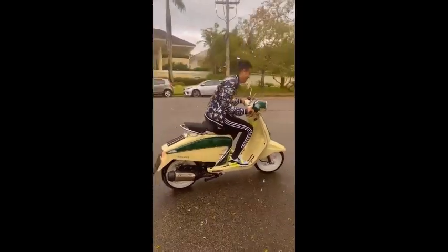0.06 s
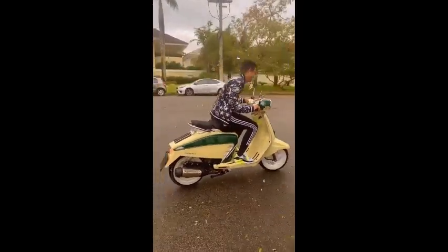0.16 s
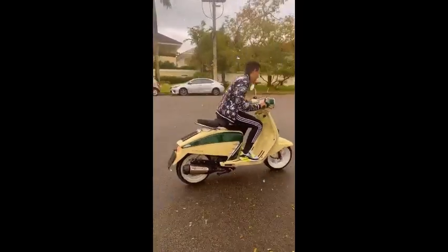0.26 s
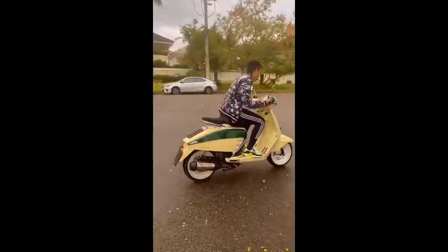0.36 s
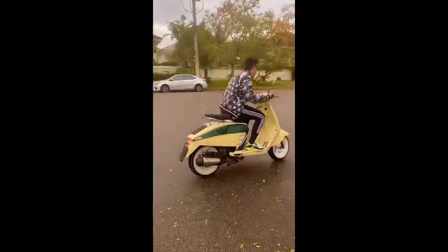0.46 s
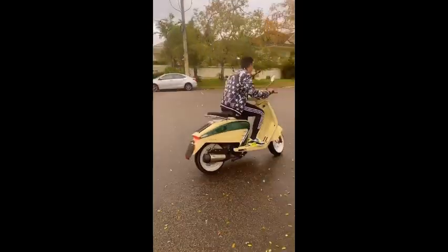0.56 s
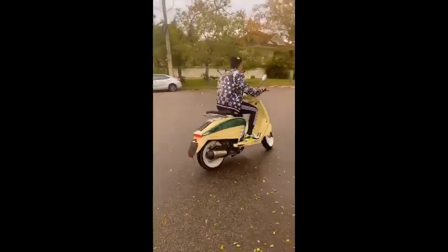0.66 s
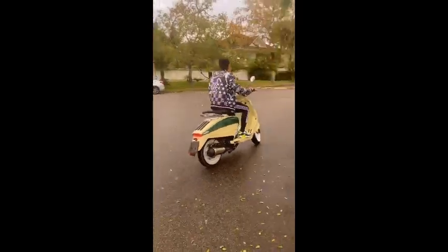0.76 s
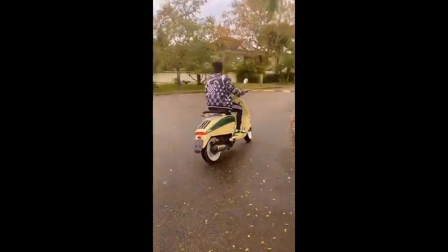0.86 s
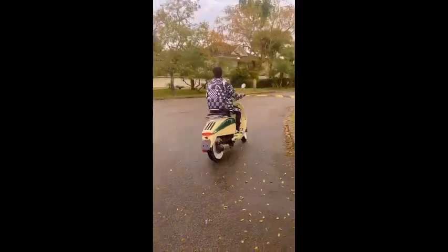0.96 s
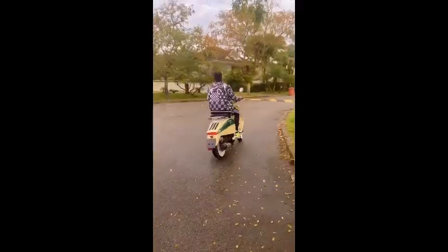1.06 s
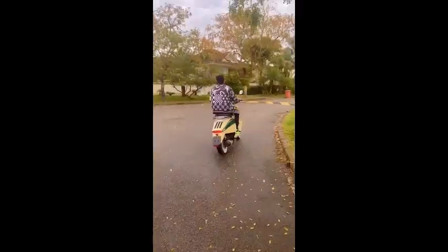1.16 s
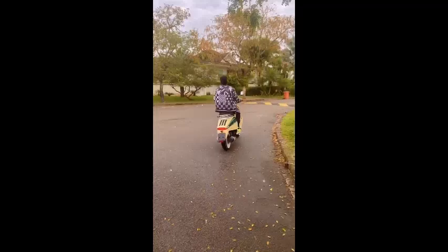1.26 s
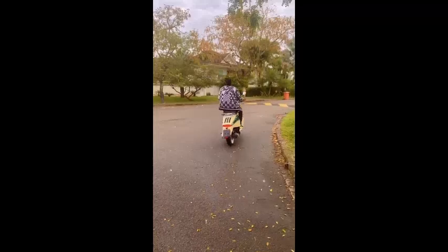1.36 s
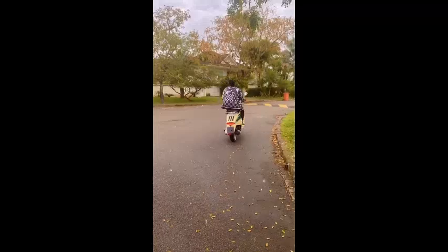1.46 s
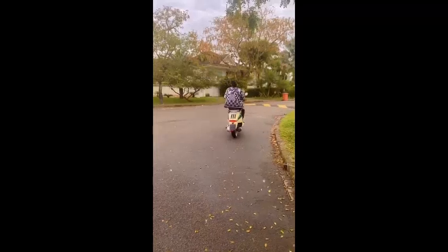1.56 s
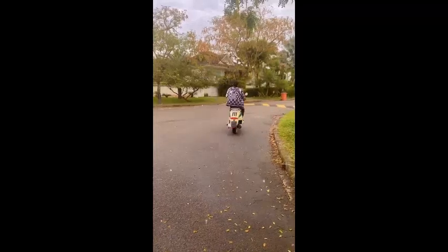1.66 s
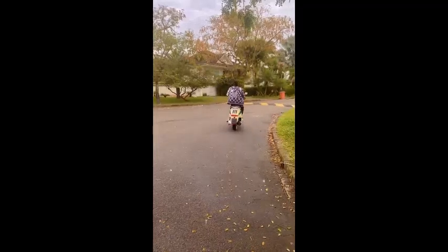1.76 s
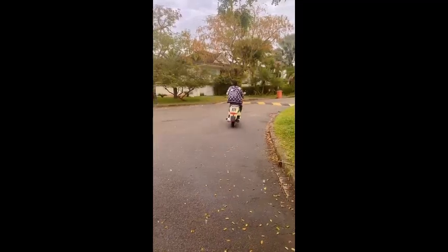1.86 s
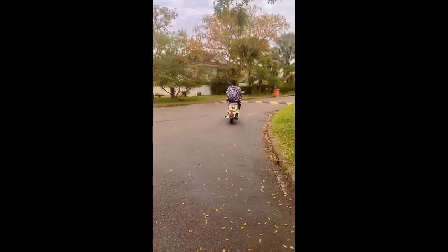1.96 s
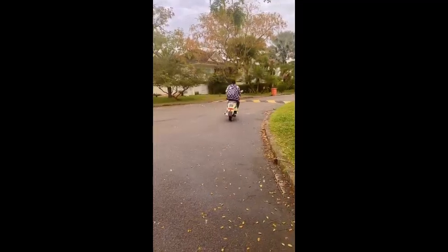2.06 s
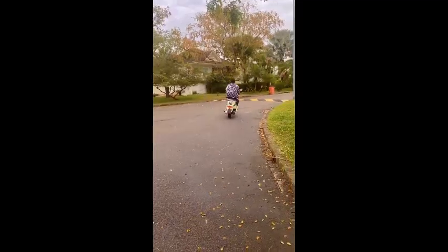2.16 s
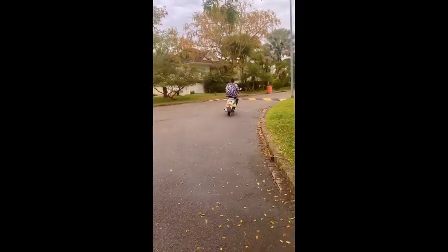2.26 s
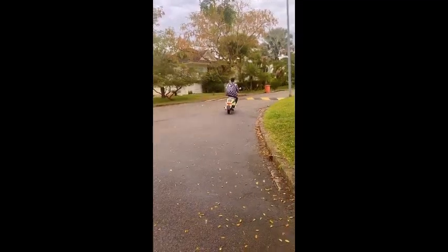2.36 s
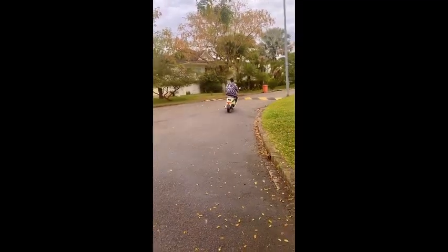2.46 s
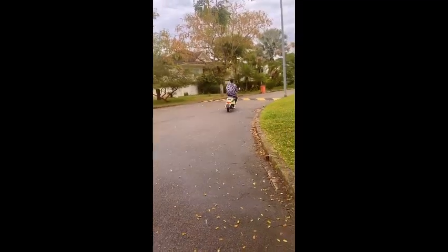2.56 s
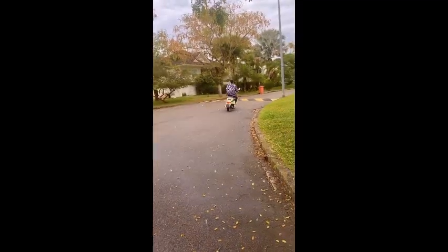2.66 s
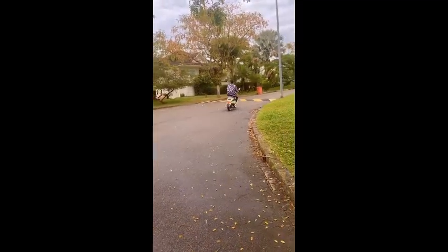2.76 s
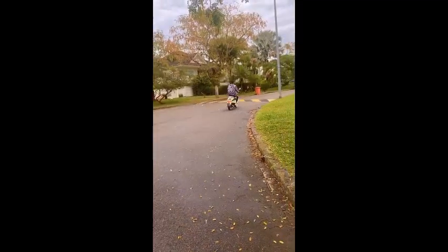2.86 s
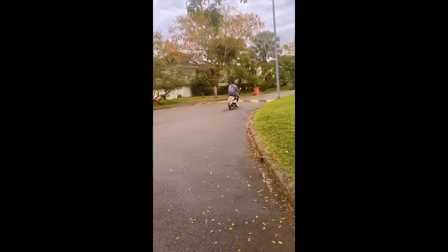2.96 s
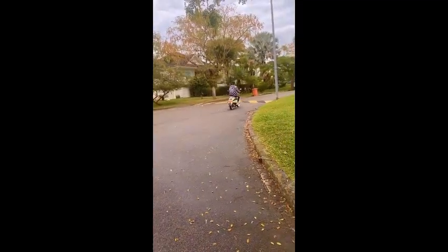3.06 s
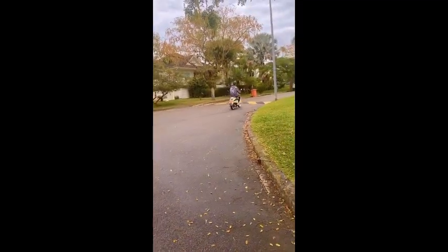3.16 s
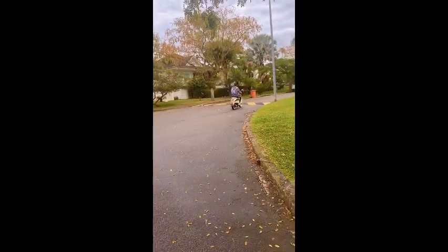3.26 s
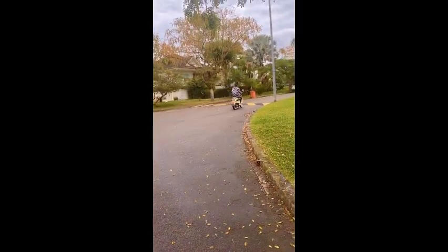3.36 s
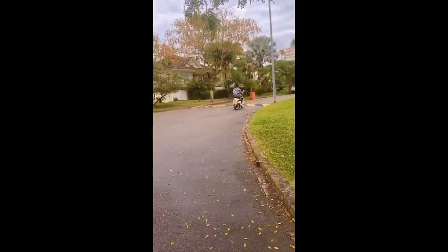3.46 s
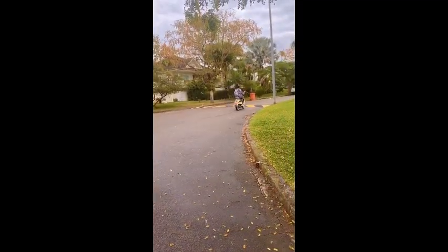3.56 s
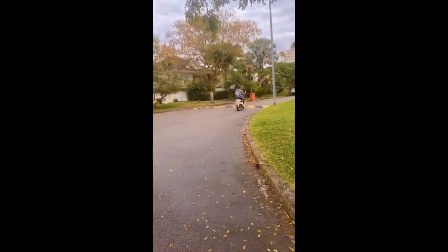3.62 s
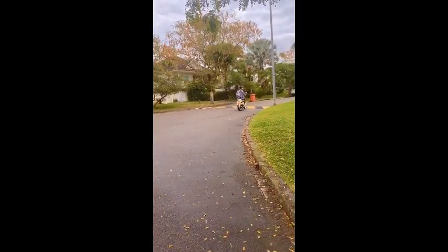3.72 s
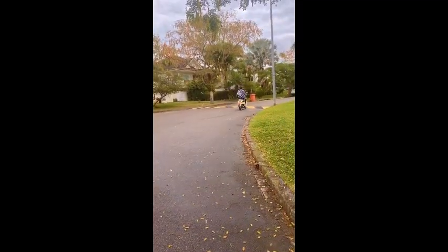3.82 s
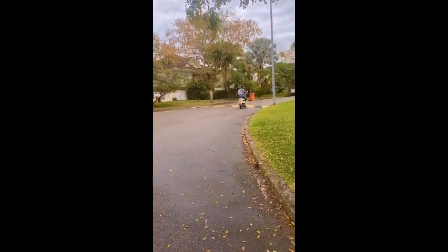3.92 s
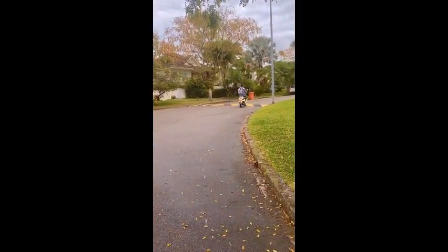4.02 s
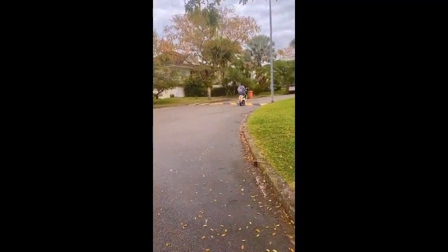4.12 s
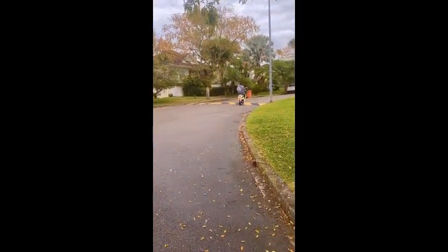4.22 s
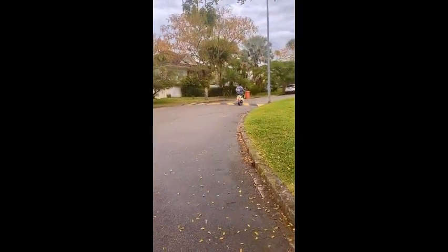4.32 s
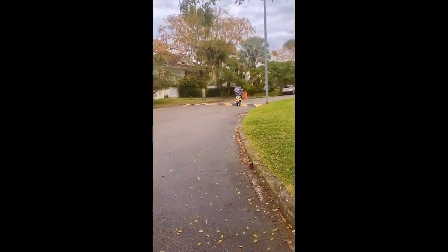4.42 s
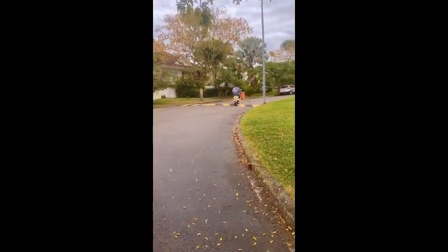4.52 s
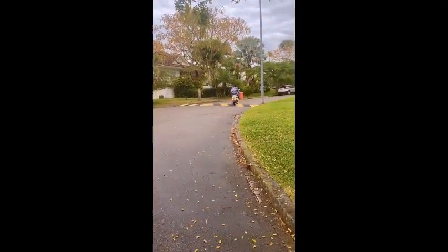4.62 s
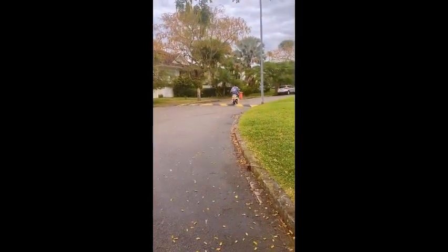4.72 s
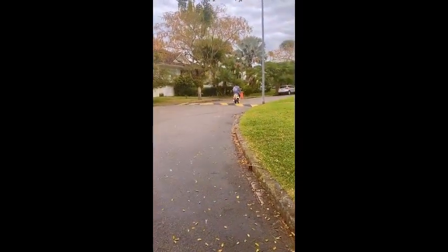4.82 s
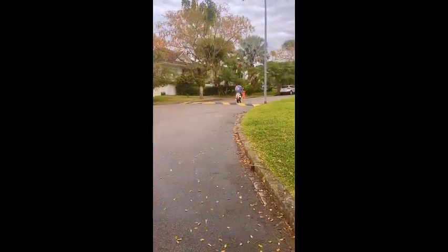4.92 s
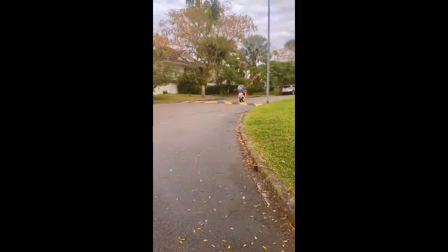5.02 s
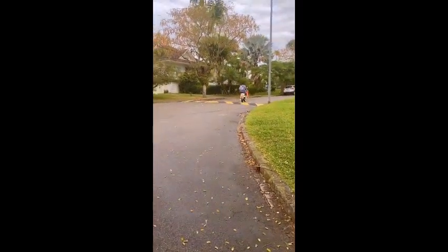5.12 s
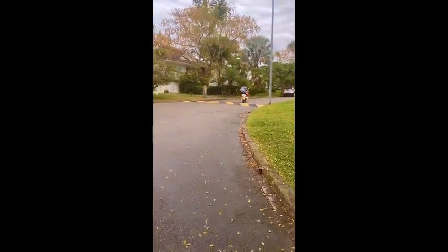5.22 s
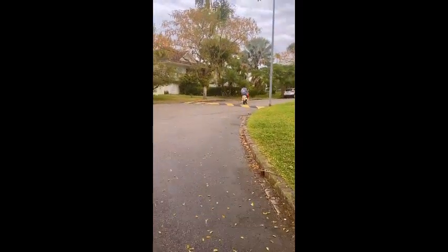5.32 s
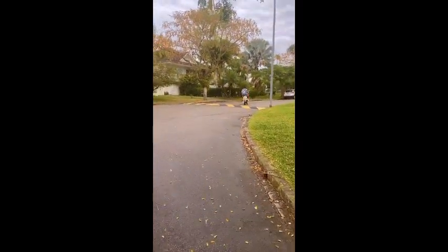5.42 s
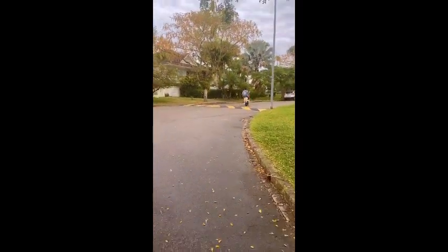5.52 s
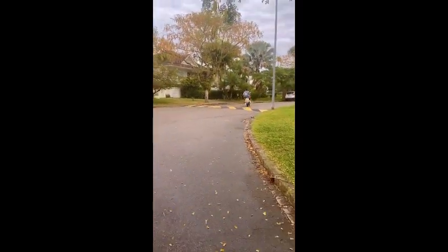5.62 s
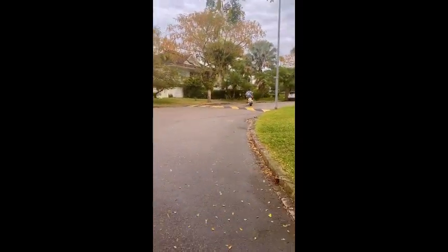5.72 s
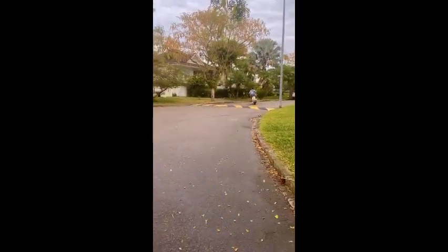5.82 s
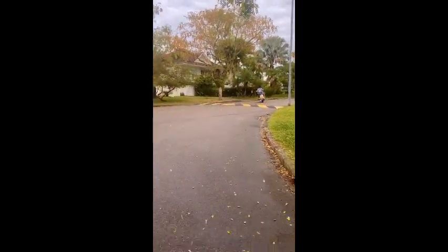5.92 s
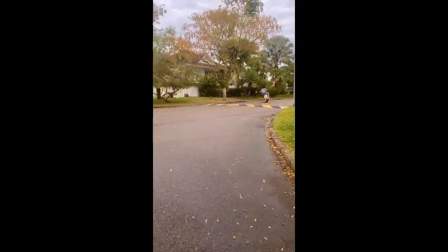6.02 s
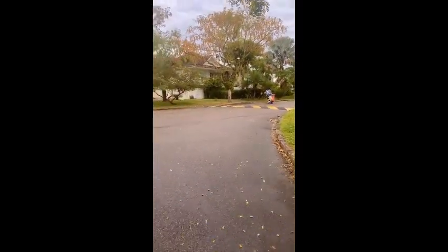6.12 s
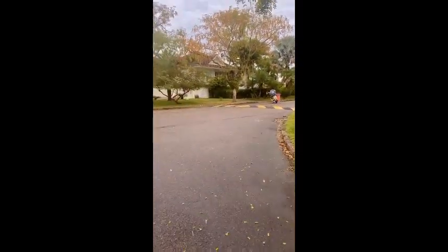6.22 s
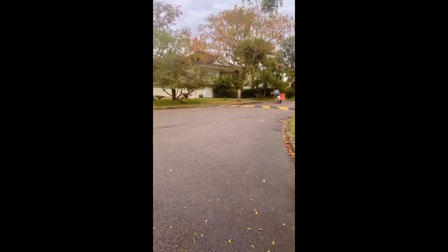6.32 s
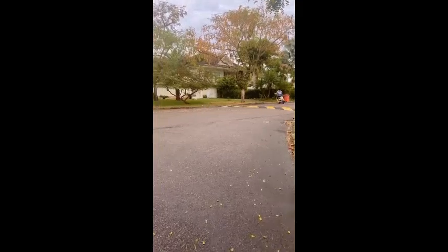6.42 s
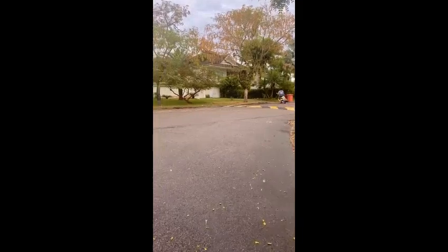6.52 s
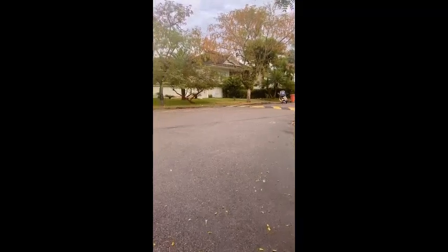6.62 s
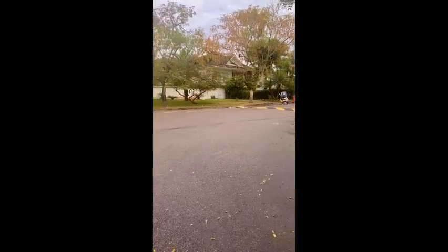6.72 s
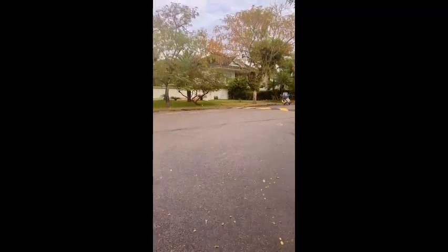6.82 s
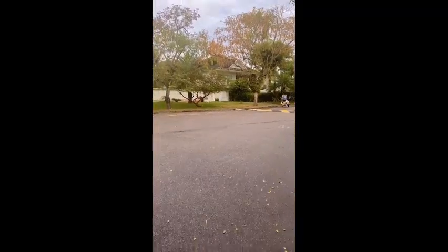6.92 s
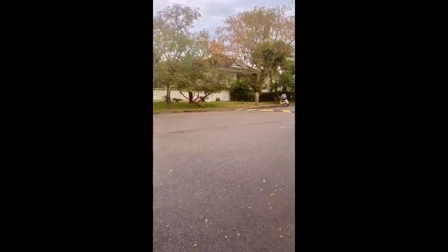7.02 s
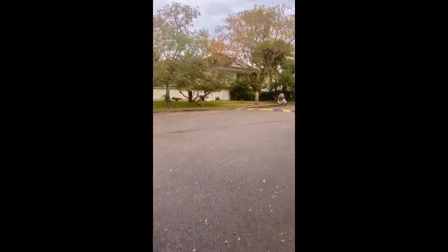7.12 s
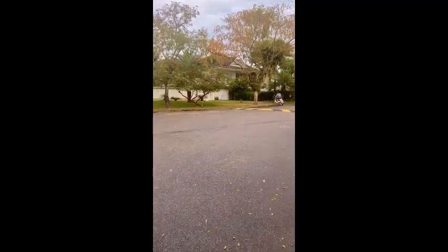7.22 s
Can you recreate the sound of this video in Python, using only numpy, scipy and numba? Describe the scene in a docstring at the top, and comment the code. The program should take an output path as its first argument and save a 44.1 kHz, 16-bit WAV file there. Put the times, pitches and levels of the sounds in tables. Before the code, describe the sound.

A single-cylinder scooter starts close, rising from a low putter to a hard, rapid drone with casing rattle, gear whine and airy hiss. It shrinks with distance, coasts down and putters unevenly at idle, with dull suspension knocks. A second, much quieter pull follows far away before the revs fall again. Heard in mono from the roadside in open air, over faint low street rumble.

```python
"""Scooter pulling away

A small single-cylinder four-stroke scooter pulls away hard down a quiet street, coasts to idle at a speed bump,
opens the throttle again far off and slows once more. Each firing is a click that rings muffler and casing modes;
idle pops are short sinking tones. Sines make crank hum, gear whine, bump knocks and one bird chirp;
filtered noise makes air and tyre hiss and the low rumble of the street."""
import sys
import numpy as np
from scipy import signal
from scipy.io import wavfile
from scipy.ndimage import uniform_filter1d
from numba import njit

SR = 44100
rng = np.random.default_rng(int(sys.argv[2]) if len(sys.argv) > 2 else 0)


def digitize_waveform(pressure):
    """Quantize a signal to 16-bit integers and store it at the path in sys.argv[1].

    Rows of a 2-D input are taken as channels; values are limited to [-1, 1].
    """
    field = np.atleast_2d(pressure).T
    bounded = np.clip(field, -1, 1)
    quanta = np.round(bounded * 32767).astype(np.int16)
    wavfile.write(sys.argv[1], SR, quanta)


N = 321136
TIME = np.arange(N) / SR

# first firing of each pull: time_s
FIRST_FIRING_S = (.024, 4.45)
# engine settling to idle, then picking up: time_s, firing_hz, pop_peak_db
IDLE_CURVE = [(2.882, 22.05, -31), (3.079, 20.21, -33), (3.122, 16.83, -31.5), (3.658, 14.31, -30),
              (4.234, 12.74, -30), (4.45, 23.35, -29)]
# casing and air: time_s, ring_hz, hiss_db, ring_re_hiss_db
CASING_CURVE = [(0.0, 1330, -32, 0), (0.22, 1420, -28.5, -2), (0.45, 1403, -24.5, 2.5),
                (0.69, 1321, -25.5, -3.5), (0.87, 1280, -27.5, -10), (0.95, 1220, -27.5, -2.5),
                (1.19, 1193, -33, -2), (1.48, 1120, -36, -7), (1.66, 1130, -39, -1.5),
                (2.15, 1145, -42, -1), (2.55, 1060, -44.5, -5), (2.8, 959, -50, 1.5), (3.38, 979, -55, -3),
                (4.16, 1174, -57, -5.5), (4.42, 1110, -50, -6), (4.52, 1100, -46, 1), (4.76, 1170, -44, -2),
                (5.58, 1126, -46, -2), (6.18, 1090, -47.5, 4), (6.6, 1200, -49.5, -1.5),
                (6.72, 1149, -48, -5.5), (6.8, 1140, -50, 1), (6.93, 1090, -49, 4), (7.1, 1083, -52.5, -3),
                (7.28, 1303, -51.5, -4)]

FULL_REVS_HZ = 38   # firing rate
BEHIND_TO_FAR_S = 3.35


def from_db(db):
    """dB to gain."""
    return np.exp(np.asarray(db) * np.log(10) / 20)


def rms_one(x):
    """Scale to rms 1."""
    return x / np.sqrt(np.mean(x ** 2) + 1e-20)


def in_time(rows):
    """Columns of a curve table, interpolated sample by sample."""
    s, *columns = np.transpose(rows)
    return [np.interp(TIME, s, c) for c in columns]


def ramp(start_s, length_s):
    """0 before, 1 after a straight rise."""
    return np.clip((TIME - start_s) / length_s, 0, 1)


def drift(rate_hz):
    """Slow random curve of rms 1: noise through a two-pole low-pass."""
    step_hz = 200
    steps = rng.standard_normal(round(N / SR * step_hz) + 2)
    r = np.exp(-2 * np.pi * rate_hz / step_hz)
    smooth = rms_one(signal.lfilter([1], [1, -2 * r, r * r], steps))
    return np.interp(TIME * step_hz, np.arange(len(steps)), smooth)


def band_pass(x, low_hz, high_hz):
    """Second-order Butterworth band."""
    return signal.sosfilt(signal.butter(2, [low_hz, high_hz], "band", fs=SR, output="sos"), x)


def resonate(x, hz, width_hz):
    """One two-pole resonance, gain about 1 on top."""
    r = np.exp(-np.pi * width_hz / SR)
    zeros = np.array([1, 0, -1]) * (1 - r * r) / 2
    poles = [1, -2 * r * np.cos(2 * np.pi * hz / SR), r * r]
    return signal.lfilter(zeros, poles, x + 1e-18)


def ring_modes(x, modes):
    """Resonances in parallel, signs alternating."""
    return sum((-1) ** k * from_db(db) * resonate(x, hz, width_hz) for k, (hz, width_hz, db) in enumerate(modes))


@njit
def glide(x, hz, r, sr):
    """A resonance whose centre moves."""
    out = np.zeros(len(x))
    for i in range(2, len(x)):
        drive = (1 - r * r) / 2 * (x[i] - x[i - 2])
        out[i] = drive + 2 * r * np.cos(2 * np.pi * hz[i] / sr) * out[i - 1] - r * r * out[i - 2]
    return out


def coloured(spectrum, patchy_db, tilt_db=0):
    """Third-octave noise bands at rms about 1, each with its own flicker; tilt turns about 3 kHz."""
    hz, db = np.transpose(spectrum)
    white = rng.standard_normal((2, N))
    edges = 22 * 2 ** np.arange(0, 9.7, 1 / 3)
    out, power = 0, 0
    for k, (low, high) in enumerate(zip(edges, edges[1:])):
        centre = np.sqrt(low * high)
        level_db = np.interp(np.log(centre), np.log(hz), db)
        if level_db > -75:
            band = band_pass(white[k % 2], low, high)
            power += from_db(2 * level_db) * (high - low) * 2 / SR
            octaves = np.clip(np.log2(centre / 3000), -1, 1)
            out = out + band * from_db(level_db + tilt_db * octaves + patchy_db * drift(7.7))
    return out / np.sqrt(power)


def crank():
    """Cycle count, firing rate, exhaust and hum levels; each pull counts from its own first firing."""
    # engine above idle, one curve a pull: time_s, firing_hz, exhaust_db (relative), hum_db
    pulls = [
        [(0.0, 19.9, -29, -22.5), (0.08, 23.4, -30, -40), (0.19, 30.9, -24, -25.5), (0.3, 35.13, -24.5, -21.5),
         (0.39, 36.81, -22, -18.5), (0.6, 39.58, -21, -17), (0.9, 39.38, -21, -18.5), (1.21, 38.57, -25, -20.5),
         (1.48, 37.04, -26.5, -27.5), (1.76, 36.88, -31.5, -32.5), (1.99, 34.33, -33.5, -36.5),
         (2.2, 32.91, -32.5, -41), (2.37, 31.63, -36, -41), (2.55, 30.32, -39, -44), (2.63, 29.42, -44.5, -39),
         (2.71, 27.7, -51.5, -44), (2.84, 23.96, -52.5, -50), (2.9, 22.42, -49, -48)],
        [(4.4, 22.2, -49, -61), (4.54, 29.47, -37.5, -40), (4.62, 34.37, -38.5, -38), (4.7, 36.74, -36, -35.5),
         (4.96, 37.17, -37.5, -38), (5.06, 36.8, -37.5, -38), (5.7, 36.18, -37, -33.5),
         (5.97, 38.46, -40, -36.5), (6.23, 38.02, -40.5, -50), (6.37, 36.6, -41.5, -36),
         (6.55, 36.57, -42.5, -38.5), (6.64, 36.46, -46, -56), (6.75, 34.21, -46, -37), (6.88, 32.59, -44, -40),
         (7.05, 28.8, -52, -36), (7.17, 24.97, -58, -45), (7.28, 22.2, -56, -43)],
    ]
    last_firing_s = 2.87   # first pull
    rate, exhaust_db, hum_db = in_time(pulls[0] + pulls[1])
    cycles = np.cumsum(rate) / SR
    start = [np.interp(s, TIME, cycles) for s in FIRST_FIRING_S]
    pulling = (TIME < last_firing_s) | (TIME > FIRST_FIRING_S[1] - .01)
    return cycles - np.where(TIME > 3.6, start[1], start[0]), rate, exhaust_db, hum_db, pulling


def firings(cycles, rate, pulling):
    """One click a cycle, rms about 1; on a shut throttle the revs fall and the burn grows uneven."""
    at = np.flatnonzero((np.diff(np.floor(cycles)) > 0) & pulling[1:])
    chance = rng.standard_normal((300, 2))[:len(at)]
    falling_hz_per_s = -uniform_filter1d(np.gradient(rate) * SR, size=9000)[at]
    shut = np.clip((falling_hz_per_s - 3) / 8, 0, 1)
    jitter_s = (.00004 + .0003 * shut) * chance[:, 0]
    spread_db = (.8 + 1.5 * shut) * chance[:, 1]
    moved = at + np.round(SR * jitter_s).astype(int)
    clicks = np.zeros(N)
    clicks[np.clip(moved, 0, N - 1)] = from_db(spread_db) * np.sqrt(SR / rate[at])
    return clicks


def coasting(rate):
    """0-1: the revs are low and sinking."""
    below_hz, over_hz = 33.06, 3.9
    sinking = uniform_filter1d((np.gradient(rate) < 0).astype(float), size=6000)
    return sinking * np.clip((below_hz - rate) / over_hz, 0, 1)


def muffler(clicks, modes):
    """The blow-down pulse rings the chambers."""
    return band_pass(-ring_modes(clicks, modes), 60, 650)


def exhaust(clicks, rate, exhaust_db):
    """Deep thump and bark keep a fixed balance; throttle and distance shift the upper modes, revs and
    distance the rasp."""
    # modes of the muffler, of its upper range near and far, and of the tailpipe: hz, width_hz, level_db
    deep_modes = [(93.6, 30.1, -2), (110.4, 65.5, 3.5), (136, 29, 6.5)]
    bark_modes = [(172.2, 63, 2), (250, 178, -6), (262.6, 95, -11)]
    upper_modes = [(349, 33.6, 3), (402, 32, 1), (442.4, 33, 2), (468, 45, 1), (506, 31, -5.5),
                   (575, 30, -6)]
    upper_far_modes = [(257, 18, 5), (350, 8.7, 9.5), (454, 74, -19.5), (480, 8.7, 1.5)]
    tailpipe_modes = [(579, 65, -13.5), (773, 11, 4), (930, 24, -21.5), (1030, 380, -4), (1283, 60, 4)]
    deep_db, bark_db, upper_db = 24, 24, 10   # against the exhaust level
    speaks_db = 10.5   # upper modes speak up at full throttle close by
    rasp_db, rasp_far_db, rasp_db_per_hz = 1.5, 7, 1.4   # carries better far off, thins at low revs
    coast_mute = .47

    below_full_hz = np.clip(FULL_REVS_HZ - rate, 0, None)
    speaks = ramp(.036, .43) * (1 - ramp(1.374, .063))
    far = ramp(BEHIND_TO_FAR_S, .3)
    blows = from_db(exhaust_db) * clicks * np.clip(1 - coast_mute * coasting(rate), 0, 1)
    rasp_gain = from_db(rasp_db + rasp_far_db * far - rasp_db_per_hz * below_full_hz)
    rasp = band_pass(ring_modes(rasp_gain * blows, tailpipe_modes), 520, 1500)
    deep = muffler(from_db(deep_db) * blows, deep_modes)
    bark = muffler(from_db(bark_db) * blows, bark_modes)
    upper = muffler(from_db(upper_db + speaks_db * speaks) * (1 - far) * blows, upper_modes)
    upper_far = muffler(from_db(upper_db) * far * blows, upper_far_modes)
    return deep - bark + upper + upper_far + rasp


def idle_firings():
    """Samples at which the idling engine fires; the second firing fails."""
    running = (TIME >= IDLE_CURVE[0][0]) * (TIME < IDLE_CURVE[-1][0])
    cycles = np.cumsum(in_time(IDLE_CURVE)[0] * running) / SR
    return np.delete(np.flatnonzero(np.diff(np.ceil(cycles)) > 0), 1)


def idle_pops(clicks, rate, exhaust_db):
    """While the valve is open the pipe swings, sinking in pitch; a deeper ring follows; the gas jet ticks."""
    valve_open_s, pop_hz, pop_start_hz, after_ring_hz = .0195, 98, 270, 62
    pop_lag_s, pop_spread_db = .0015, .7
    tick_db, tick_rise_db, tick_spread_db = -28, 8, 2   # against the pop, sharper as the throttle opens
    # slow firings of a pull pop too, more when coasting; against the exhaust level
    slow_pop_db, coast_pop_db, slow_below_hz, slow_over_hz = 12.5, 9.5, 31.9, 5.6

    t = np.arange(round(.08 * SR)) / SR
    turns = pop_hz * t + (pop_start_hz - pop_hz) * .0025 * (1 - np.exp(-t / .0041))
    open_valve = np.clip(np.minimum(t / .0012, (valve_open_s - t) / .0046), 0, 1)
    after = np.clip(t - valve_open_s, 0, None)
    after_ring = .42 * np.exp(-after / .032) * np.sin(2 * np.pi * after_ring_hz * after)
    shape = -open_valve * np.sin(2 * np.pi * turns) - after_ring

    pops, ticks = np.zeros(N), np.zeros(N)
    at = idle_firings()
    pop_db = in_time(IDLE_CURVE)[1][at]
    chance = rng.standard_normal((40, 2))[:len(at)]
    pops[at + round(pop_lag_s * SR)] = from_db(pop_db + pop_spread_db * chance[:, 0])
    opening = at > IDLE_CURVE[-2][0] * SR
    ticks[at] = from_db(pop_db + tick_db + tick_rise_db * opening + tick_spread_db * chance[:, 1])

    slow = np.clip((slow_below_hz - rate) / slow_over_hz, 0, 1)
    slow_gain = from_db(exhaust_db + slow_pop_db + coast_pop_db * coasting(rate))
    pops += clicks * np.sqrt(rate / SR) * slow_gain * slow
    jet = band_pass(rng.standard_normal(N), 450, 7000)
    jet_gain = signal.lfilter([1], [1, -np.exp(-1 / (.0042 * SR))], ticks)
    return signal.fftconvolve(pops, shape)[:N] + jet * jet_gain


def contacts(clicks):
    """Valves and piston: the same soft knocks go with every click."""
    # delay_s, level_db
    knock_rows = [(0, -3), (.0043, -13.5), (.0091, -8), (0.012, -2.5), (0.0197, 1)]
    knocks = sum(from_db(db) * np.pad(clicks, (round(s * SR), 0))[:N] for s, db in knock_rows)
    return signal.sosfilt(signal.butter(2, 1600, fs=SR, output="sos"), knocks)


def puffs(clicks, decay_s, depth):
    """Gain that jumps at each firing and sinks again; rms about 1."""
    marks = (clicks != 0).astype(float)
    gate = signal.lfilter([1], [1, -np.exp(-1 / (decay_s * SR))], marks)
    gate = 1 + depth * uniform_filter1d(gate, size=90)
    return gate / np.sqrt(uniform_filter1d(gate ** 2, size=4000))


def rattle(x, modes):
    """Loose panels: each resonance swells and fades on its own."""
    flicker_db = 2.5
    return sum(from_db(flicker_db * drift(1.43)) * ring_modes(x, [mode]) * (-1) ** k
               for k, mode in enumerate(modes))


def casing(clicks, rate):
    """Knocks and puffed noise in the casing ring and panels, and the broad hiss of intake, fan and tyres."""
    # body panels from the side, from behind and from afar: hz, width_hz, level_db
    panels_side = [(820, 59, -28), (2000, 120, -11.5), (3180, 240, -15), (3920, 180, -14.5),
                   (5290, 430, -16), (13400, 260, -26)]
    panels_behind = [(1690, 73, -5.5), (2696, 108, -7.5), (3964, 320, -9.5), (5210, 150, -11),
                     (6160, 330, -16), (13100, 560, -31)]
    panels_far = [(545.6, 29, -24), (865, 26, -1), (1720, 230, -8.5), (2203, 245, -7), (2620, 44, -8.5),
                  (3370, 66, -20.5), (4040, 170, -17), (13800, 740, -37)]
    # hz, density_db (relative, per Hz)
    hiss_spectrum = [(320, -25.5), (550, 2), (683, -18), (1100, -3), (1560, -7), (2220, -10.5), (2950, -16),
                     (5280, -20), (9580, -42.5), (14000, -39)]
    side_to_behind_s = 1.065
    coast_from_s, coast_to_s = 1.85, 3.76
    coast_tilt_db, pickup_tilt_db = -2, 2   # per octave: coasting dulls, opening again brightens for a while
    ring_flicker_db, panels_db = 1.84, 15

    ring_hz, hiss_db, ring_db = in_time(CASING_CURVE)
    dull = ramp(coast_from_s, .41) * (1 - ramp(coast_to_s, .26))
    bright = ramp(coast_to_s, .36) * (1 - ramp(FIRST_FIRING_S[1] + .32, .77))
    tilt_db = coast_tilt_db * dull + pickup_tilt_db * bright

    fired = clicks != 0
    fired[idle_firings()] = True
    slow = (FULL_REVS_HZ / rate) ** 2.5   # slow firings stand apart as ticks
    air = rng.standard_normal(N) * puffs(fired, decay_s=.0045, depth=.5 * slow)
    drive = .95 * contacts(clicks) / np.sqrt(slow) + air

    r = np.exp(-np.pi * 180 / SR)   # 180 Hz wide, two in series
    ring = rms_one(glide(glide(drive, ring_hz, r, SR), ring_hz, r, SR))
    ring = ring * from_db(ring_db + ring_flicker_db * drift(2.7))

    turned = np.clip((TIME - side_to_behind_s) / .2 + .5, 0, 1)
    far = np.clip((TIME - BEHIND_TO_FAR_S) / .96 + .5, 0, 1)
    panels = ((1 - turned) * rattle(drive, panels_side) + turned * (1 - far) * rattle(drive, panels_behind)
              + far * rattle(drive, panels_far))
    hiss = coloured(hiss_spectrum, patchy_db=1.5, tilt_db=tilt_db)
    hiss = hiss * puffs(clicks, decay_s=.0025, depth=.65 * slow)
    return from_db(hiss_db) * (ring + hiss + from_db(panels_db) * panels)


def whine(cycles):
    """Gear teeth sing on high orders: each swell rises, sags and dies."""
    # order (per firing cycle), start_s, length_s, level_db (before the sag)
    swell_rows = [(21.85, 0.52, 0.75, -37.5), (31.2, 0.41, 0.87, -30), (36.14, 0.32, 0.504, -27.5),
                  (30.64, 5.85, 0.23, -46)]
    attack_s, release_s, sag_db_per_s = .12, .11, 6.5
    out = 0
    for order, s, length_s, db in swell_rows:
        sagging_db = db - sag_db_per_s * (TIME - s).clip(0)
        swell = ramp(s, attack_s) * (1 - ramp(s + length_s, release_s)) * from_db(sagging_db)
        flicker = from_db(2.71 * drift(7.1))
        out = out + swell * flicker * np.sin(2 * np.pi * order * cycles + .7 * drift(5.1))
    return out


def tones(cycles, rate, hum_db, pulling):
    """The crank turns twice a cycle and hums, weaker off load; gear teeth whine on high orders."""
    off_load_share = .48
    fade = uniform_filter1d(pulling.astype(float), size=3000)
    falling_hz_per_s = -uniform_filter1d(np.gradient(rate) * SR, size=6000)
    load = np.clip((16 - falling_hz_per_s) / 6, 0, 1)
    hum = (load + off_load_share * (1 - load)) * np.sin(4 * np.pi * (cycles - .35))
    return np.sqrt(2) * (from_db(hum_db) * fade * hum + whine(cycles))


def bumps():
    """Wheels and suspension over bumps: a soft push rings a low mode as a dull knock."""
    # start_s, level_db (before decay and soft onset), pitch_hz, t60_s
    bump_rows = [(1.813, -20, 132, 0.083), (3.799, -22, 74.6, 0.12), (4.203, -20.5, 72.4, .2),
                 (4.76, -29, 111, .1), (5.345, -14, 82, 0.079), (6.68, -27, 76, 0.17),
                 (6.94, -38.5, 509, 0.14)]
    out = np.zeros(N)
    for s, db, hz, t60_s in bump_rows:
        t = np.clip(TIME - s, 0, None)
        out += from_db(db - 60 * t / t60_s) * np.tanh(t / .0062) * np.sin(2 * np.pi * hz * t)
    return out


def bird():
    """One faint chirp: a thin sine whistle that rises and falls."""
    # time_s, pitch_hz, peak_db
    chirp = [(2.10, 6500, -96), (2.13, 7200, -66), (2.17, 8160, -64), (2.20, 6140, -53), (2.24, 5170, -60),
             (2.27, 4904, -90)]
    hz, db = in_time(chirp)
    sounding = (TIME > chirp[0][0]) * (TIME < chirp[-1][0])
    return from_db(db) * sounding * np.sin(2 * np.pi * np.cumsum(hz) / SR)


def street():
    """Low rumble: coloured noise with a steady part and a part that follows the scooter's hiss level."""
    # hz, density_db (relative, per Hz)
    rumble_spectrum = [(18, -31), (30, 2), (130, -16), (304, -7), (470, -18), (656, -26), (991, -31.5),
                       (1660, -46), (2920, -81), (4520, -42), (14000, -103.5)]
    steady_db, near_db, follows = -48.5, -33, .8
    hiss_db = in_time(CASING_CURVE)[1]
    near = from_db(near_db + follows * (hiss_db - hiss_db.max()))
    return np.hypot(from_db(steady_db), near) * coloured(rumble_spectrum, patchy_db=1.2)


def scene():
    """All sources, heard in the open street."""
    cycles, rate, exhaust_db, hum_db, pulling = crank()
    clicks = firings(cycles, rate, pulling)
    engine = exhaust(clicks, rate, exhaust_db) + idle_pops(clicks, rate, exhaust_db)
    engine = engine + casing(clicks, rate) + tones(cycles, rate, hum_db, pulling)
    return (engine + bumps() + bird() + street())[None]


def record(dry):
    """The microphone drops the deepest bass, the top is cut."""
    cutoff_hz = 14000
    thin = signal.sosfilt(signal.butter(2, 35, "high", fs=SR, output="sos"), dry)
    return signal.sosfilt(signal.ellip(12, .5, 70, cutoff_hz, fs=SR, output="sos"), thin)


dry = scene()
out = record(dry)
digitize_waveform(out)
```